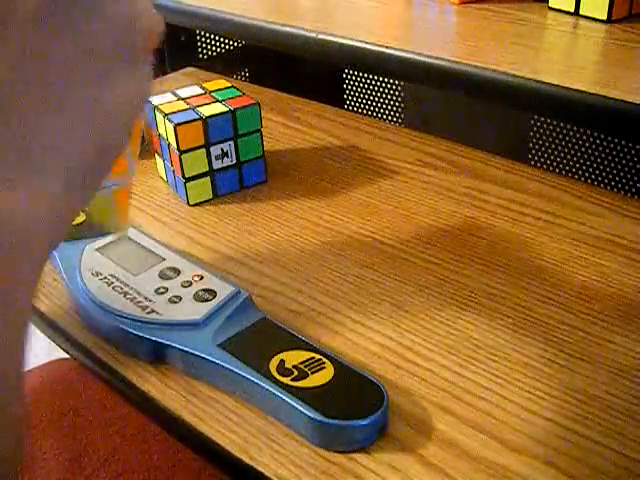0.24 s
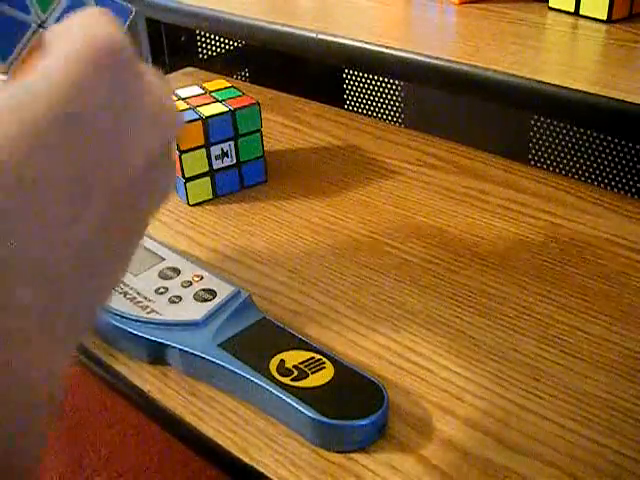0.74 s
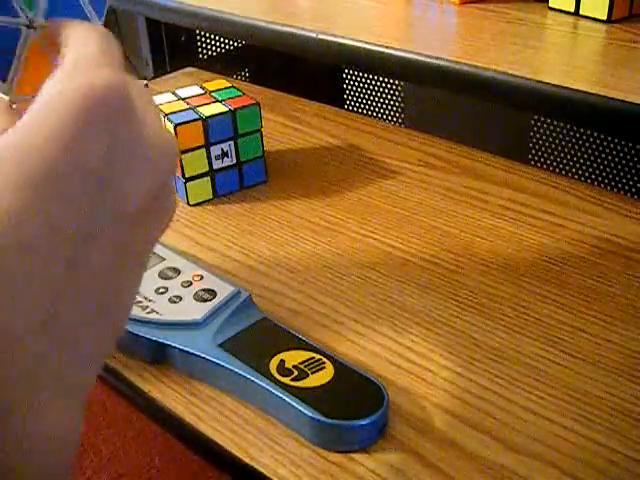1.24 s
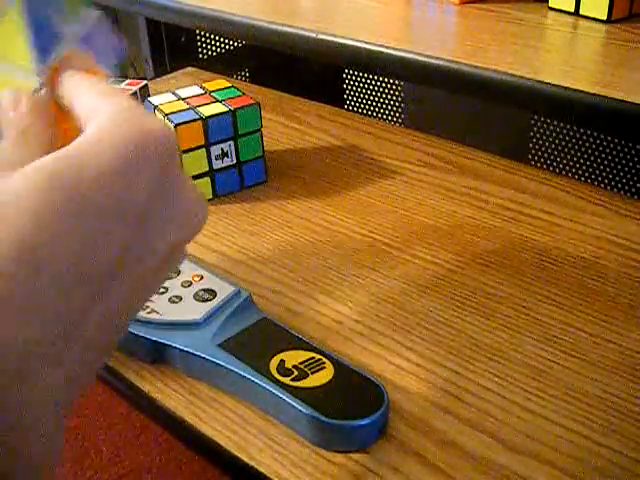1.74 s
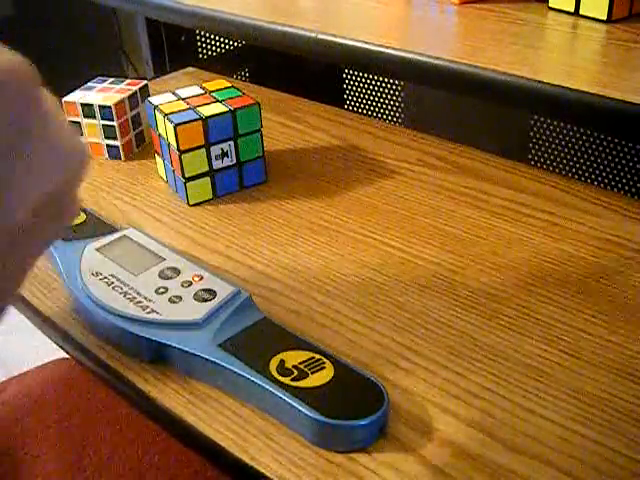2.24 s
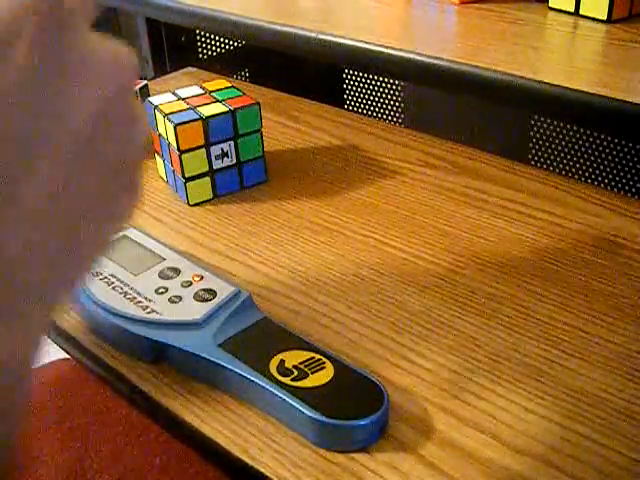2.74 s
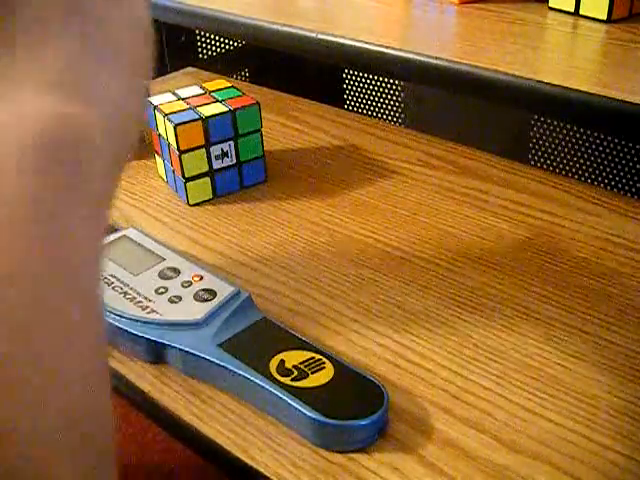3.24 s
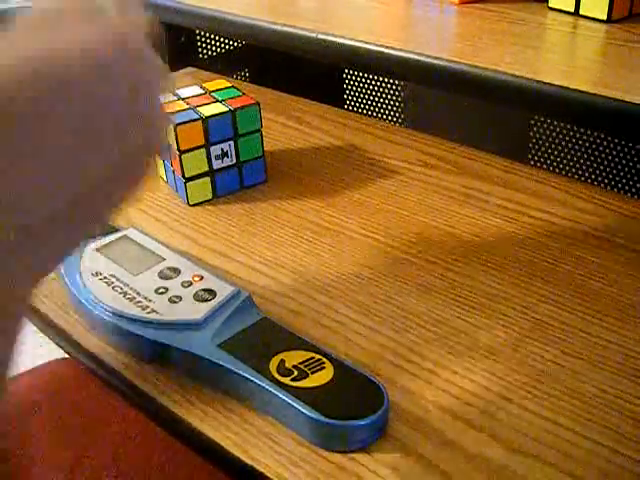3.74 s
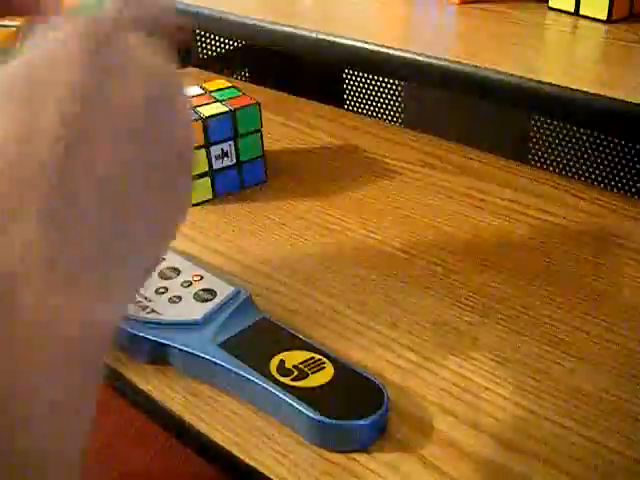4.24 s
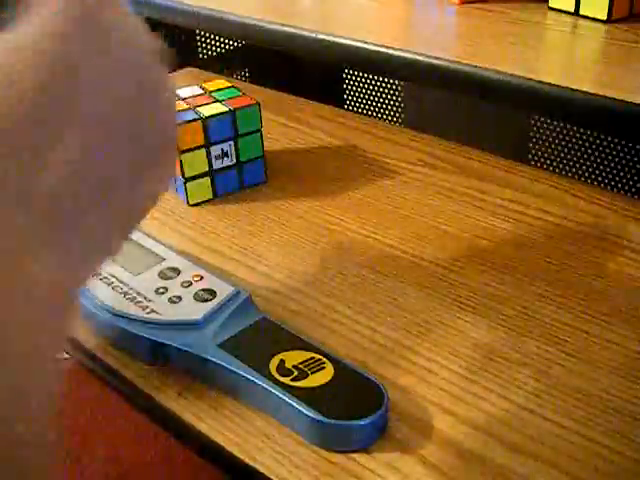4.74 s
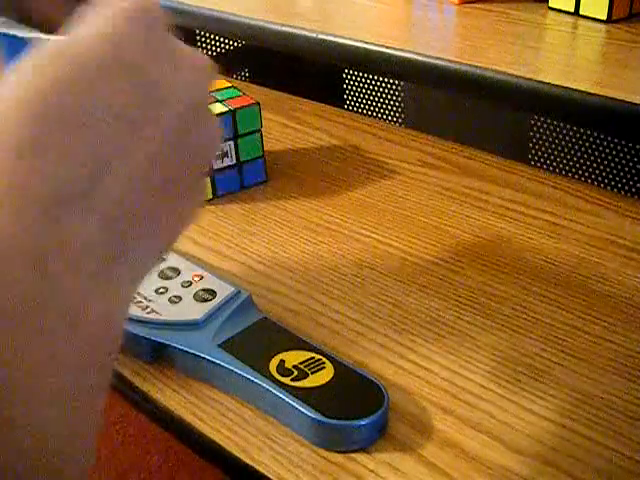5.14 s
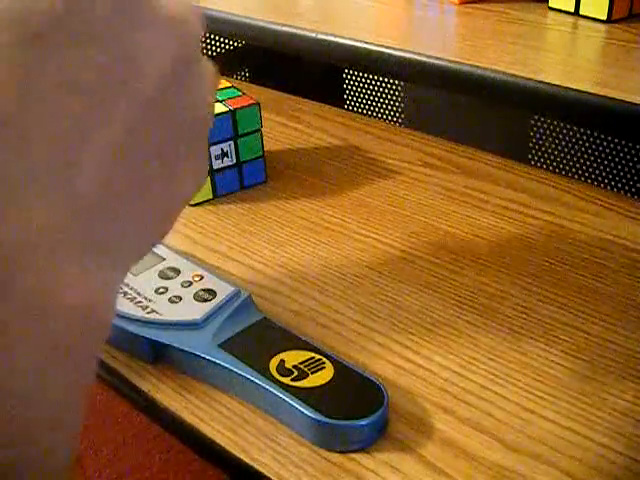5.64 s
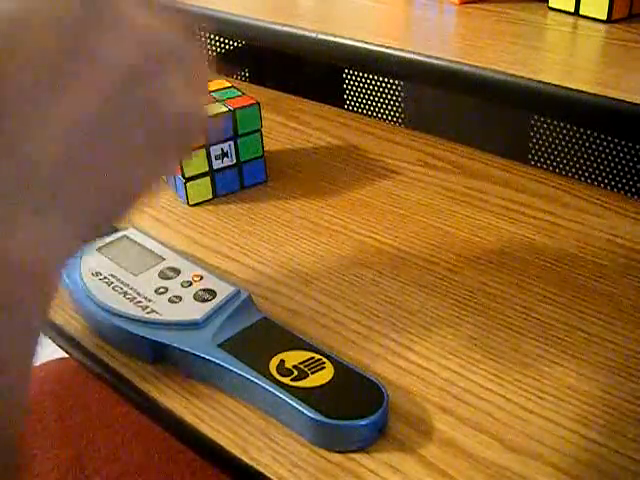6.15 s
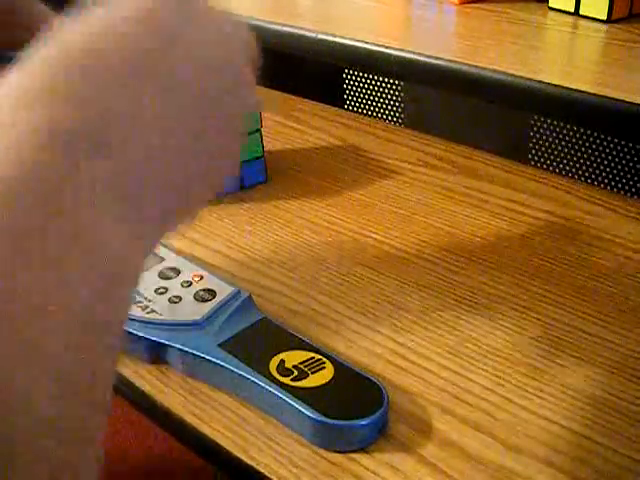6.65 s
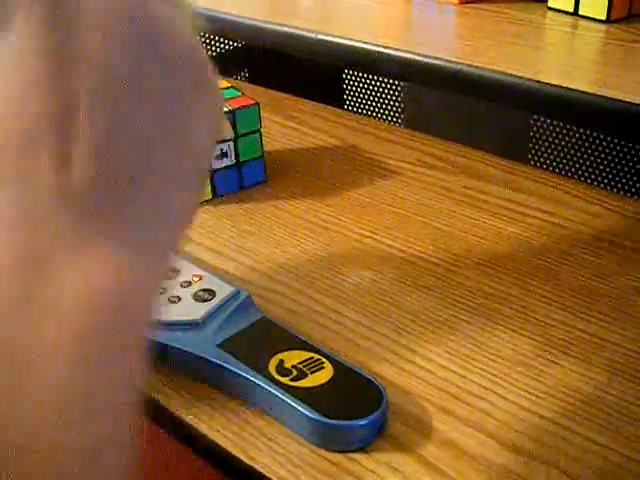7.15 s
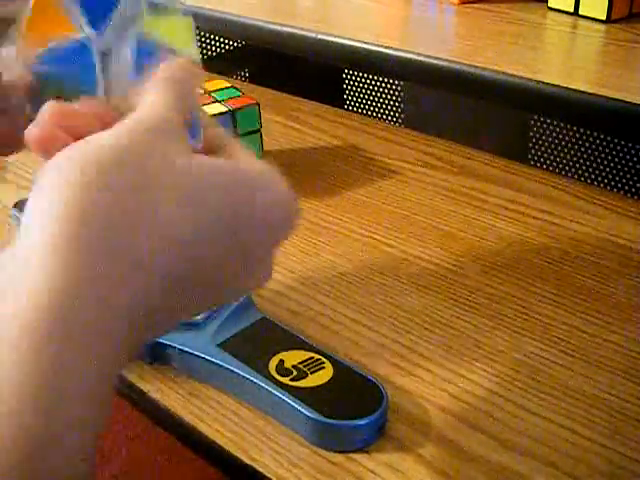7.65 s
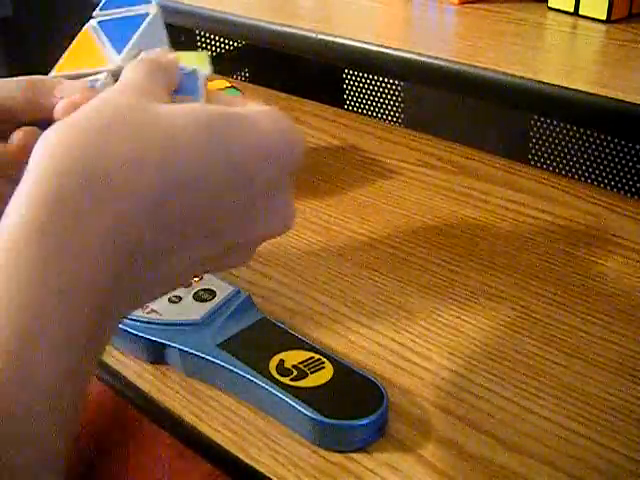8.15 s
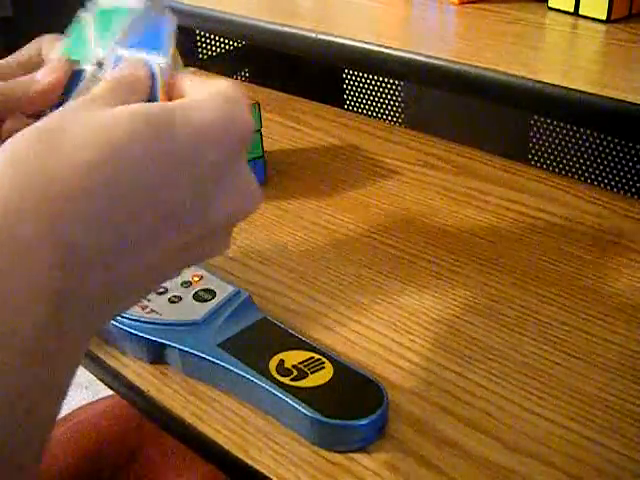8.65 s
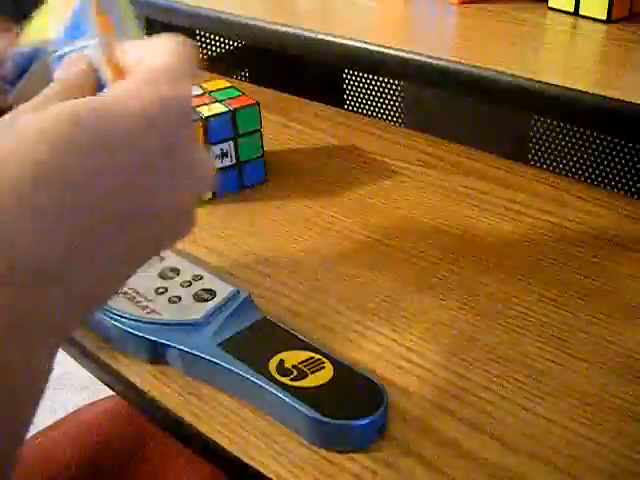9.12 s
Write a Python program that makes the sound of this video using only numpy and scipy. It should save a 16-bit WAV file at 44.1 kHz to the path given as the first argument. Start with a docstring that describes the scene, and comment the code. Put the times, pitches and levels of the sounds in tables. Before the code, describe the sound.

A hollow plastic twisty puzzle is worked fast by two hands just above a wooden desk, close to a small microphone, over steady soft hiss. From 0 to 1.5 s there are light, scattered clicks with one crisper tick near 0.8. A loud clack at 1.6 starts denser clusters, with sharp snaps around 2.3 and a faint low squeak in a soft rustle near 2.5. Clicks crowd from 3.5 to 3.9, thin briefly, then crowd again from 4.5 to 4.9, crunchy and rattling. From 5 to 5.9 almost only hiss remains. Light ticks return, then hard snaps from 6.5 to 7.8. After a short lull, tiny squeaks and dull desk bumps join around 8.1 to 8.4; a sharp snap lands at 8.8 and scattered clicks run to the end, about 9.4. Short room reflections; the level ducks slightly after loud flurries.

```python
"""A plastic twisty puzzle is turned fast in two hands just above a wooden desk, close to a small microphone.
Over steady hiss its pieces snap into their seats: short click clusters scrape and rattle, denser from 1.6 s.
A squeak in a soft rustle comes near 2.5 s; the clicks crowd from 3.5 to 4.9 s, then almost stop.
Light clicks return from 5.9 s, hard snaps from 6.5 s; soft desk bumps and squeaks join near 8.1-8.4 s.
Desk and room answer briefly; the recorder's gain control ducks everything after loud flurries."""
import sys
import numpy as np
from scipy import signal
from scipy.fft import rfft, irfft
from scipy.io import wavfile
from scipy.ndimage import uniform_filter1d

SR = 44100
rng = np.random.default_rng(int(sys.argv[2]) if len(sys.argv) > 2 else 0)


def nominal_scale(level):
    """Amplitude ratio for a level in decibels (scalar or array-like)."""
    x = np.asarray(level, float) / 20
    return 10 ** x


def dump_mix(stems):
    """Bounce the given channels to the path in sys.argv[1] as a 16-bit WAV at rate SR."""
    frames = np.atleast_2d(stems).T  # one column per channel
    limited = np.clip(frames, -1, 1)  # hard clip at full scale
    pcm = np.round(limited * 32767).astype(np.int16)
    wavfile.write(sys.argv[1], SR, pcm)


N = 413658

# snaps of the pieces: time_s, mid_db (2.5-8 kHz, loudest 2 ms), body_re_mid_db (under 2.5 kHz),
# treble_re_mid_db (over 8 kHz), chatter_ms (decay constant, later held to 0.3-9)
SNAP_TABLE = [(0.0536, -28, -20, 7.5, 2.7), (0.133, -28.5, -28, 6.5, 0.9), (0.1602, -34, -9, 3, 1.3),
              (0.1714, -27.5, -20, 7.5, 1), (0.2654, -33, -17, 4, 1.3), (0.2941, -35.5, -21, 5, 0.7),
              (0.3701, -33.5, -8, -4, 1.2), (0.3792, -28, -35, 7.5, 1.9), (0.3862, -46, -17, 7, 3),
              (0.4205, -41, -8, -1, 1.6), (0.4337, -41.5, -5, 5, 1.5), (0.5945, -49, -1, 11, 2.3),
              (0.6224, -33, -17, -6, 1.1), (0.6683, -47, -14, -2, 2.4), (0.7912, -17.5, -25, 10, 0.53),
              (0.7982, -38, -13, 14, 1.1), (1.0383, -28.5, -10, 3.5, 1.7), (1.2967, -48, -9, -3, 2.1),
              (1.5724, -31.5, -18, 8, 0.8), (1.592, -36, -3, -1, 5.3), (1.5977, -20.5, -14, 0, 2),
              (1.6082, -9, -19, 5.5, 6.1), (1.6175, -14.5, -20, 6.5, 0.62),
              (1.6647, -25.5, -17.5, 7.5, 3.2), (1.693, -30, -24, 10, 0.6), (1.713, -36, -20, 10, 0.82),
              (1.7184, -29.5, -14, 7, 0.6), (1.7572, -37.5, -6, 5, 1.6), (1.8918, -40.5, -6, 2, 3),
              (1.955, -42, -11, -19, 1.1), (1.975, -39.5, -27, -1, 1.5), (2.0248, -30.5, -28, -2, 1.2),
              (2.049, -39, -2, -33, 1.6), (2.1017, -25.5, -13, -1, 2.2), (2.143, -27.5, -26, -2.5, 1.0),
              (2.183, -22.5, -12, -1.5, 2.5), (2.1976, -32.5, -16, 11, 4.5), (2.2079, -34, -13, 5, 1.2),
              (2.2147, -37.5, -16, 0, 6.8), (2.2192, -39, -8, 0, 2.7), (2.2804, -18, -1, 3, 1.4),
              (2.2854, -11.5, -25, 10, 1.8), (2.2933, -9, -17.5, 5, 1.4), (2.3257, -28, -25, 10, 1),
              (2.3905, -31.5, -8, 1, 1.2), (2.4123, -36, -25, 4, 0.87), (2.4396, -42, -6, 5, 2.8),
              (2.5145, -31, -12, 6.5, 1.3), (2.5298, -26.5, -12.5, -2.5, 3.8),
              (2.602, -29.5, -27, 3.5, 0.79), (2.628, -43.5, -6, 12, 1.6), (2.683, -39.5, -13, 10, 0.6),
              (2.7022, -41, -5, 10, 0.9), (2.7125, -30, -12, 15, 1.2), (2.7193, -41, -14, 15, 0.9),
              (2.8689, -44.5, -4, 10.5, 0.81), (2.9544, -38.5, -19, 6, 0.7), (2.966, -38.5, -2, -5, 0.63),
              (2.9856, -24.5, -16, 13.5, 0.25), (3.0292, -27, -12.5, 2, 0.9), (3.0603, -32.5, -18, 8, 2.0),
              (3.0902, -20.5, -17, 12, 0.65), (3.1272, -33, -12, -1, 1.3), (3.1653, -32, -20, 6, 1.1),
              (3.1792, -27.5, -19, 11, 1.2), (3.1921, -40, -10, 6, 2.7), (3.2072, -29, -18, 6, 1.2),
              (3.2822, -31.5, -5, 1, 0.5), (3.3026, -24.5, -15, 5, 0.8), (3.3095, -39, -12, -1, 6.6),
              (3.3708, -21.5, -11.5, -1.5, 0.6), (3.4534, -37.5, 0.5, -2, 1), (3.4624, -46, -4, 12, 0.6),
              (3.4744, -29, -5, -11, 2.2), (3.484, -18.5, -10.5, 10.5, 4.2), (3.487, -20.5, -12, 8, 1.15),
              (3.4984, -22, -5, 11.5, 0.76), (3.5302, -15, -7.5, 1, 3.4), (3.5384, -22, -10, 0, 3.1),
              (3.6362, -8, -8, 4, 4.7), (3.657, -19, -10, -3, 4.8), (3.6676, -17, -18, 0.5, 1.2),
              (3.682, -32, -17, 2, 2.9), (3.717, -21.5, -29, 8.5, 1.3), (3.7234, -11.5, -17.5, 2.5, 1.1),
              (3.7484, -26, -8, 0, 4.6), (3.7568, -19, -13, 4, 3.3), (3.7674, -12.5, -11.5, 6, 2.2),
              (3.8143, -29, -14, 6, 0.6), (3.82, -19.5, -26, 7, 1.1), (3.829, -18, -15, 9.5, 1.2),
              (3.872, -12, -15, 3.5, 5.9), (3.878, -8, -18, 5.5, 2.8), (3.9667, -38, -17, 6, 1.8),
              (4.0046, -34, -26, 4, 0.7), (4.054, -45.5, -5, 0, 1.6), (4.169, -50, -6, 9, 3.3),
              (4.178, -41, -8, 0.5, 5.9), (4.1997, -42, -10, -2, 0.6), (4.217, -27.5, -16, 7.5, 1.1),
              (4.2462, -37, -10, 13.5, 0.8), (4.3151, -30.5, -23, 13.5, 0.47), (4.3214, -50, -12, 6, 2.6),
              (4.38, -36.5, -16, 9.5, 1.3), (4.4613, -31.5, -18, 5, 0.6), (4.4855, -34, -10, 2, 1.7),
              (4.499, -21.5, -19, 3, 1.5), (4.5048, -17, -8.5, 3, 2.5), (4.518, -7, -25, -3.5, 1.8),
              (4.5226, -19.5, -9, 7.5, 4.3), (4.5534, -38, -11, 3, 7.9), (4.5676, -19.5, -22, 6, 5.8),
              (4.6329, -31.5, -6, 7, 1.2), (4.6667, -27, -10, 12, 4.1), (4.6748, -22, -8, 0, 11),
              (4.6898, -19, -11.5, 3, 3.7), (4.7118, -20.5, -13, 0, 5.9), (4.7334, -13.5, -8, 1, 2.3),
              (4.7836, -10.5, -16.5, 3.5, 0.96), (4.7919, -16, -12, 5.5, 0.47), (4.7967, -23, -12, 4, 4.4),
              (4.8372, -31.5, -12, -1, 6.9), (4.853, -28, -1, -9, 0.97), (4.868, -13, -12, 5.5, 2),
              (4.8744, -20, -11, 15.5, 0.74), (4.8882, -13.5, -17, 7.5, 5.3), (4.8923, -10.5, -13, 1, 3),
              (4.9148, -39, -13, 3, 7.2), (4.9402, -24.5, -10, 11.5, 1.4), (5.44, -45, -13, -1, 1.6),
              (5.6176, -44.5, -8, 0, 1.6), (5.7977, -38.5, -16, -1, 1.1), (5.897, -28.5, -7, 6, 3.3),
              (5.905, -39, -9, 7, 1), (5.93, -31.5, -14, 0, 5.6), (5.9923, -37, -7.5, 1, 2.5),
              (6.0204, -37.5, -16, 7, 0.66), (6.1417, -23, -11, 1, 0.81), (6.224, -35, -8, -4, 3.3),
              (6.2501, -42, -1, 4, 1.7), (6.2732, -44.5, -14, 6, 1.5), (6.3131, -40, -16, 1, 1.2),
              (6.3201, -39.5, -27, 5, 1.2), (6.3829, -32, -17, 2, 1.5), (6.4967, -38.5, -9, 5, 0.91),
              (6.5245, -18.5, -7, 4, 1.3), (6.5367, -8.5, -15, 5.5, 2), (6.5422, -12, -12, 0, 1.1),
              (6.6297, -33, -13, 7, 0.66), (6.6794, -24, -6, 1, 2.5), (6.6867, -21, -10, -3, 8.5),
              (6.6933, -18, -30, -1, 1.9), (6.7224, -26.5, -11, 10, 0.52), (6.7645, -6, -10.5, 4.5, 2.3),
              (6.803, -28.5, -25, 10, 13), (6.8832, -38, -10, -12, 0.8), (6.9496, -29, -5, -4, 0.77),
              (6.956, -26.5, -9, 5, 0.67), (6.961, -28, -23, -0.5, 2.4), (6.9704, -9.5, -12, 0.5, 3.2),
              (7.0455, -27, -8, 3.5, 7.3), (7.0528, -27, -12, -5, 1.8), (7.0805, -32.5, 1, -1, 1.1),
              (7.106, -24, -12, -18, 8), (7.1129, -8.5, -10.5, 5, 4.5), (7.1778, -17, -14, 3.5, 5.3),
              (7.2122, -17.5, -12, -0.5, 5.8), (7.2244, -20.5, -14, -7, 5), (7.2283, -14.5, -18, 2.5, 2.6),
              (7.3264, -29.5, -8, -6, 0.35), (7.4259, -23, -18, 15.5, 0.36), (7.43, -25, -18, 2, 3.6),
              (7.4776, -28, -7, 1, 1.2), (7.5059, -33, -11, 10, 0.51), (7.5874, -17, -16, 2, 2),
              (7.6594, -38, -14, -16, 1.3), (7.699, -27, -5, -1, 3.1), (7.7057, -13, -12, 8.5, 3.7),
              (7.7134, -10.5, -11.5, -3, 7.5), (7.7185, -16, -7.5, 12.5, 2), (7.7276, -30, -17, 15, 0.44),
              (7.7587, -29, -10, -2, 2.8), (7.7783, -16, -19, 3.5, 0.6), (7.996, -45, -12, -8, 1.6),
              (8.0159, -38.5, -20, -3, 0.85), (8.1111, -35.5, -6, -1, 1.2), (8.122, -45, -2, -9, 2.1),
              (8.1904, -24, -22, 3.5, 1.3), (8.2423, -42, -1, -3, 3.3), (8.268, -33.5, -11, 4, 0.9),
              (8.277, -30, -14, 3, 1.2), (8.3, -40, -5, 2, 2), (8.3194, -24, -20, 7, 1),
              (8.3236, -32, -9, 6, 2), (8.4479, -44, -10, -3, 0.91), (8.4604, -20.5, -6.5, 2.5, 1.8),
              (8.4657, -31, -4, 7, 1.2), (8.5245, -28, -18, -7, 1.6), (8.5301, -40, -11, 7, 1.4),
              (8.5355, -38.5, 4.5, 0, 5.4), (8.5403, -28.5, -19, -4, 0.7), (8.5455, -27, -10, 1, 0.85),
              (8.5601, -25, -7.5, 1, 1.4), (8.5844, -37, 0, 19.5, 0.75), (8.6132, -18, -12.5, 10.5, 2.1),
              (8.6696, -33, -11, -9, 0.52), (8.8284, -9, -19.5, 2.5, 0.74), (8.842, -23, -18, 2, 1.7),
              (8.8478, -22, -12, 4, 3.9), (8.8664, -31, -14, 7, 7.4), (8.8706, -22.5, -18, -1, 1.4),
              (8.8798, -23, -21, 9, 0.6), (9.049, -42.5, -17, 0, 0.67), (9.0536, -48, -8, 8, 1.1),
              (9.0884, -32.5, -34, 1.5, 1.9), (9.1785, -31.5, -5, 10, 1.5), (9.1823, -28.5, -15, -4, 1.9),
              (9.294, -28, -11, 0, 2.6), (9.2997, -22.5, -6.5, 9.5, 1.1), (9.3115, -39, -7, 4, 2.5)]
# turning effort of the hands: time_s, effort_db
EFFORT = [(0.0, -52), (1.93, -58.5), (2.19, -48), (2.87, -54.5), (3.13, -52), (3.47, -51), (3.73, -45),
          (4.02, -60), (4.21, -59), (4.78, -41), (4.99, -54), (5.33, -60), (6.19, -56), (7.11, -43),
          (8.02, -54.5), (8.41, -50), (8.91, -57), (9.38, -55)]
# broad colour of a bare plastic tick: freq_hz, relative_db
TICK_COLOUR = [(120, -40), (200, -35), (620, -16), (1000, -1.5), (1710, -6), (3620, 8), (6050, 8),
               (7830, 3.5), (10500, 2.5), (16000, 0)]


def read(points, hz):
    """Value of a spectrum table at hz, straight lines on a log axis."""
    f, value = np.transpose(points)
    return np.interp(np.log(hz + 1), np.log(f + 1), value)


def colour(x, gain):
    """Weights the spectrum of x by gain(hz)."""
    hz = np.fft.rfftfreq(x.shape[-1], 1 / SR)
    return irfft(rfft(x) * gain(hz), x.shape[-1])


def evened(x):
    """Scales to rms 1."""
    return x / np.sqrt(np.mean(x ** 2) + 1e-20)


def add(mix, start_s, sound):
    """Mixes a sound in at start_s."""
    part = mix[max(round(start_s * SR), 0):][:len(sound)]
    part += sound[:len(part)]


def hiss(rms_db=-50.5):
    """Steady noise of room and electronics."""
    # noise spectrum: freq_hz, relative_density_db
    hiss_colour = [(18, -36), (30, -1), (60, -0.5), (150, -2), (300, -4), (600, -6), (1000, -9),
                   (3000, -13.5), (6000, -18.5), (12000, -20), (16000, -18.5)]
    noise = colour(rng.standard_normal(N), lambda hz: nominal_scale(read(hiss_colour, hz)))
    return nominal_scale(rms_db) * evened(noise)


def room(direct, spread, tail_db=-11.0, onset_s=0.00033, turn_hz=7.3):
    """Single echoes of the direct sound, then a dense tail of the spread sound that dies band by band."""
    # room decay: freq_hz, t60_s
    decay = [(300, 0.17), (1000, 0.23), (3000, 0.18), (6000, 0.17), (11000, 0.2), (15000, 0.13)]
    # desk and nearby furniture: delay_s, gain_db
    echoes = [(.0031, -18.5), (.0072, -21.5), (0.0115, -26.5), (0.0147, -42)]
    hz, t, z = signal.stft(rng.standard_normal((3, SR // 2)), SR, nperseg=128)
    fade = nominal_scale(-60 * t / read(decay, hz)[:, None])
    tails = signal.istft(z * fade, SR, nperseg=128)[1]
    tails *= 1 - np.exp(-np.arange(tails.shape[1]) / (onset_s * SR))
    out = direct.copy()
    for delay_s, gain_db in echoes:
        add(out, delay_s, nominal_scale(gain_db) * direct)
    # the moving hands meet the room a little differently each moment
    for k, tail in enumerate(tails):
        turn = np.sqrt(2 / 3) * np.cos(2 * np.pi * (np.arange(N) / SR * turn_hz + k / 3))
        tail = tail / np.linalg.norm(tail)
        out += nominal_scale(tail_db) * signal.fftconvolve(spread * turn, tail)[:N]
    return out


def rustle():
    """One swell of dull band noise that rises faster than it fades."""
    # soft low rustle: start_s, length_s, level_db, centre_hz, width_hz
    swell = (2.46, .4, -56, 500, 240)
    start_s, length_s, level_db, centre_hz, width_hz = swell
    u = np.clip((np.arange(N) / SR - start_s) / length_s, 0, 1)
    dull = colour(rng.standard_normal(N), lambda hz: np.exp(-((hz - centre_hz) / width_hz) ** 2))
    return nominal_scale(level_db) * evened(dull) * np.sin(np.pi * u ** 0.49)


def bumps(half_cycles=0.91, knock_db=-7, knock_ratio=3.0):
    """Soft desk bumps: a low push of under two swings, with a higher knock in its first half."""
    # bumps against the desk: time_s (just before the push is fullest), level_db, pitch_hz
    bump_table = [(8.085, -35, 134), (8.219, -40, 72), (8.295, -35.5, 111), (8.323, -41, 83.4)]
    out, t = np.zeros(N), np.arange(3000) / SR
    for time_s, level_db, hz in bump_table:
        push_shape = np.sin(np.pi * np.minimum(t * hz / (2 * half_cycles), 1)) ** 2
        push = np.sin(2 * np.pi * hz * t) * push_shape
        knock_shape = np.sin(np.pi * np.minimum(t * hz / half_cycles, 1)) ** 2
        knock = np.sin(2 * np.pi * knock_ratio * hz * t) * knock_shape
        add(out, time_s - 0.69 * half_cycles / hz, nominal_scale(level_db) * (push + nominal_scale(knock_db) * knock))
    return out


def squeaks(sag=0.03):
    """Rubbing plastic: short soft-edged tones that sink by the fraction sag."""
    # squeaks: start_s, length_s, peak_db, mid_pitch_hz
    squeak_table = [(8.059, .011, -52, 4900), (8.074, .028, -52, 4600), (8.374, .008, -41, 2850),
                    (2.527, .018, -46, 880)]
    out = np.zeros(N)
    for start_s, length_s, peak_db, pitch_hz in squeak_table:
        u = np.arange(0, 1, 1 / (length_s * SR))
        hz = pitch_hz * (1 + sag * (0.5 - u))
        tone = np.sin(2 * np.pi * np.cumsum(hz) / SR)
        add(out, start_s, nominal_scale(peak_db) * np.sin(np.pi * u ** 0.88) ** 2 * tone)
    return out


def scrape(ticks_per_s=900, spread_db=4.0, effort_offset_db=-5.5):
    """Dense tiny ticks of uneven size under the turning effort and around each snap."""
    # a layer grinds on its way into a snap and loose pieces rattle after it
    grind_db, grind_s, rattle_db, rattle_s = -31, 0.014, -25.5, 0.037
    ticks = (rng.random(N) < ticks_per_s / SR) * rng.standard_normal(N)
    ticks *= nominal_scale(spread_db * np.minimum(rng.exponential(1, N), 4))
    grains = np.exp(-np.arange(256) / 25) * rng.standard_normal((4, 256))
    which = rng.integers(0, 4, N)
    rubbed = sum(signal.oaconvolve(ticks * (which == k), g)[:N] for k, g in enumerate(grains))
    rubbed = evened(colour(rubbed, lambda hz: nominal_scale(read(TICK_COLOUR, hz))))

    time_s, mid_db = np.transpose(SNAP_TABLE)[:2]
    blows = np.bincount((time_s * SR).astype(int), nominal_scale(mid_db), N)
    lag_s = np.arange(-SR // 4, SR // 4 + 1) / SR
    grind = nominal_scale(grind_db) * np.exp(lag_s / grind_s)
    rattle = nominal_scale(rattle_db) * np.exp(-lag_s / rattle_s)
    near = np.where(lag_s < 0, grind, rattle)
    effort = nominal_scale(np.interp(np.arange(N) / SR, *np.transpose(EFFORT)) + effort_offset_db)
    return rubbed * (effort + signal.oaconvolve(blows, near, "same"))


def taps(per_s=14):
    """Light taps at random times, levelled by the effort of the moment; rows as in SNAP_TABLE."""
    time_s, size, body, treble, length = rng.random((int(per_s * N / SR), 5)).T
    time_s = time_s * N / SR
    mid_db = np.interp(time_s, *np.transpose(EFFORT)) - 1 - 2.5 * np.log(1 - size)
    body_db = -4 + 12 * (body - 0.5)
    treble_db = -0.5 + 14 * (treble - 0.5)
    return np.c_[time_s, mid_db, body_db, treble_db, 1.9 * (0.5 + length)]


def ring(detune=0.082, spread_db=4.0):
    """One blow on the shell: each grip and piece shifts and weights the modes anew."""
    # what the hollow pieces ring with: freq_hz, relative_db, t60_s
    shell = [(950, -11, 0.01), (1910, 8.5, 0.0035), (3680, 2, 0.042), (4800, 5, 0.016), (5770, 4, 0.045),
             (8450, 13, 0.011), (11040, -12, 0.003), (11970, 14, 0.0034), (14700, 15, 0.012)]
    t = np.arange(512)[:, None] / SR
    hz, level_db, t60_s = np.transpose(shell)
    shift, weight = rng.standard_normal((2, len(hz)))
    decay = nominal_scale(level_db + spread_db * weight - 60 * t / t60_s)
    modes = decay * np.sin(2 * np.pi * hz * (1 + detune * shift) * t)
    return modes.sum(1) / np.linalg.norm(modes.sum(1))


def snaps(order=512, size=2048, ring_db=-8.5, lumpy_db=4.5):
    """Seating pieces: a few ms of tiny impacts build up, die away and ring the shell; direct and spread."""
    # the piece that is hit sings loudest: dull blows favour the big pieces, bright ones the small
    big_hz, small_hz, scatter, half_width_hz = 3515, 5740, 0.069, 195.0
    even_odds_db, odds_per_db = 1, 0.12
    out = np.zeros((2, N))
    ms = (np.arange(size) - order) * 1000 / SR
    hz = np.fft.rfftfreq(size, 1 / SR)
    low = 1 / (1 + (hz / 2500) ** 8)
    high = 1 / (1 + (8000 / (hz + 1)) ** 16)
    bands = np.array([low, 1 - low - high, high])
    no_bass = 1 / (1 + (170 / (hz + 1)) ** 4)  # small pieces radiate no bass
    for time_s, mid_db, body_db, treble_db, chatter_ms in np.r_[SNAP_TABLE, taps()]:
        is_small = rng.standard_normal() < odds_per_db * (treble_db - even_odds_db)
        sing_hz = (small_hz if is_small else big_hz) * (1 + scatter * rng.standard_normal())

        build_up = -(ms / (0.3 * chatter_ms + 0.067)) ** 2
        die_away = -ms / np.clip(chatter_ms, 0.3, 9)
        shape = np.exp(np.where(ms < 0, build_up, die_away))
        lumps = evened(uniform_filter1d(rng.standard_normal(size), size=24))
        impacts = rng.standard_normal(size) * nominal_scale(lumpy_db * lumps) * shape
        rung = signal.fftconvolve(impacts, ring())[:size]
        z = (rfft(impacts) * nominal_scale(read(TICK_COLOUR, hz)) + nominal_scale(ring_db) * rfft(rung)) * no_bass

        sing_db = 6.5 + 0.21 * (-22 - mid_db)  # light taps ring clearer than hard crunches
        z *= 1 + nominal_scale(sing_db) / (1 + 1j * (hz - sing_hz) / half_width_hz)

        parts = irfft(z * bands, size)
        loudest = np.sqrt(uniform_filter1d(parts ** 2, 88, 1).max(1))  # rms over 2 ms
        direct = nominal_scale(mid_db + np.array([body_db, 0, treble_db])) / loudest @ parts
        # summed over all directions, peaks and dips of the spectrum even out
        z = rfft(direct)
        smooth = np.sqrt(abs(uniform_filter1d(abs(z) ** 2, size=45)))
        spread = irfft(z / (abs(z) + 1e-12) * smooth, size)
        add(out[0], time_s - order / SR, direct)
        add(out[1], time_s - order / SR, spread)
    return out


def scene():
    """Puzzle in the room, bumps, rustle and hiss."""
    direct, spread = snaps() + scrape() + squeaks()
    return (room(direct, spread) + bumps() + rustle() + hiss())[None]


def band_limit(x):
    """A steep low-pass at the top of the band."""
    return signal.sosfilt(signal.butter(12, 16960, fs=SR, output="sos"), x)


def record(dry, knee_db=-33.5, depth=0.19, recover_db_per_s=1.5, gain_db=1.5, edge_hz=16000):
    """Gain control steps down on loud flurries and creeps back; peaks round off; port dip, band limit."""
    # dip of the port and top shelf: freq_hz, gain_db
    mic_response = [(6000, -2), (7000, -2.5), (7550, -8), (7800, -29.5), (8050, -15), (8600, -7),
                    (9600, -0.5), (15900, -2.5), (16050, -18)]
    power_db = 10 * np.log10(abs(uniform_filter1d(dry[0] ** 2, 2000)) + 1e-12)
    recovery_db = np.arange(N) * recover_db_per_s / SR
    cut_db = depth * np.maximum(power_db - knee_db, 0)
    cut_db = np.maximum.accumulate(cut_db + recovery_db) - recovery_db
    ducked = dry * nominal_scale(gain_db - uniform_filter1d(cut_db, 800))
    rounded = ducked / (1 + ducked ** 6) ** (1 / 6)  # the input stage rounds off the highest peaks
    heard = colour(rounded, lambda hz: nominal_scale(read(mic_response, hz)) / np.sqrt(1 + (hz / edge_hz) ** 90))
    return band_limit(heard)


dry = scene()
out = record(dry)
dump_mix(out)
```